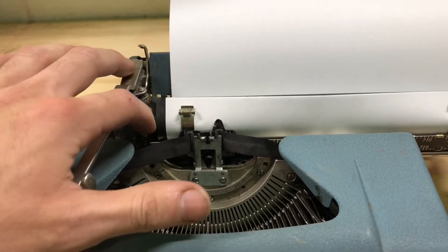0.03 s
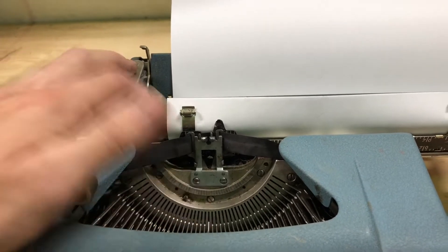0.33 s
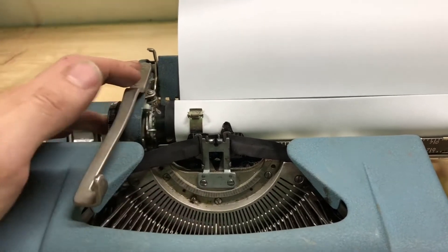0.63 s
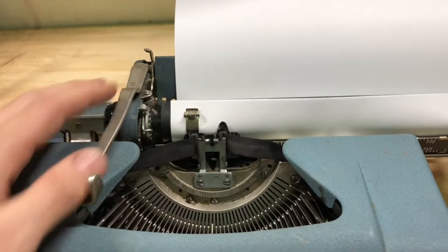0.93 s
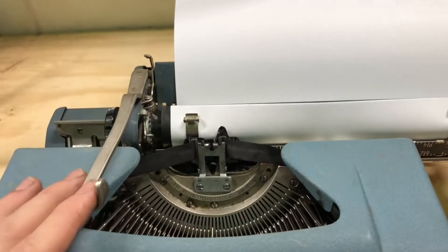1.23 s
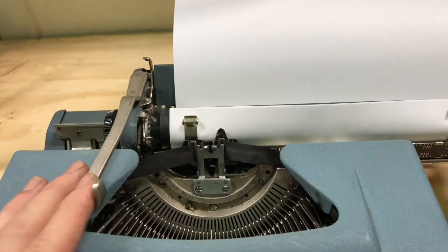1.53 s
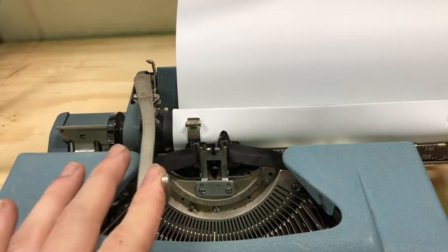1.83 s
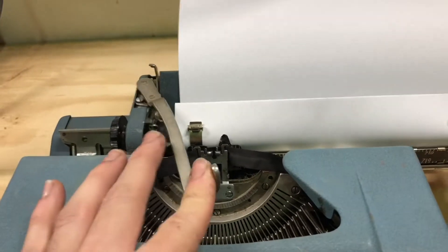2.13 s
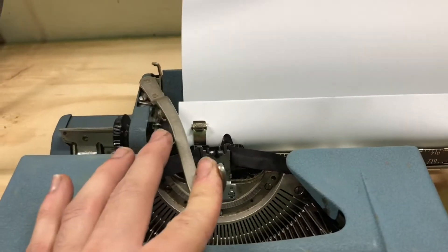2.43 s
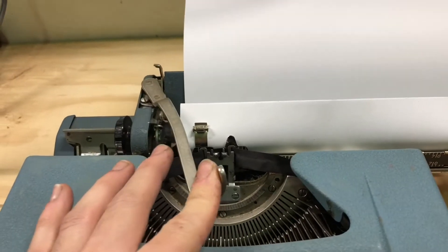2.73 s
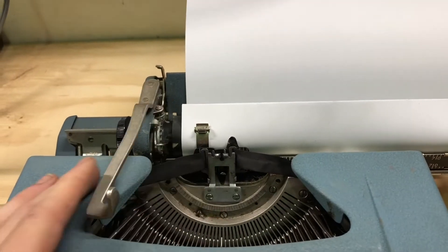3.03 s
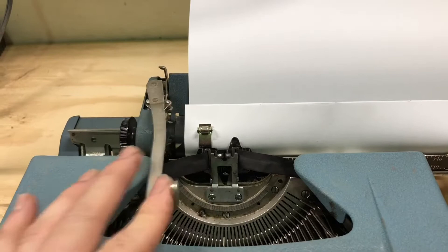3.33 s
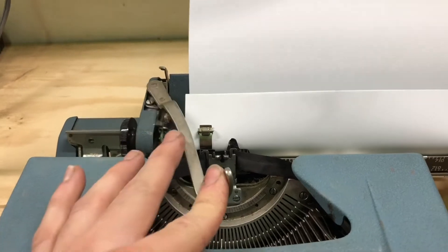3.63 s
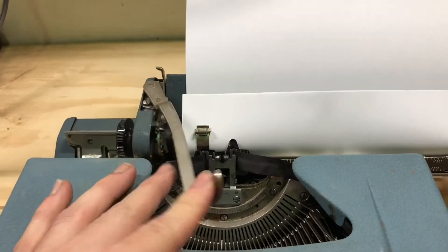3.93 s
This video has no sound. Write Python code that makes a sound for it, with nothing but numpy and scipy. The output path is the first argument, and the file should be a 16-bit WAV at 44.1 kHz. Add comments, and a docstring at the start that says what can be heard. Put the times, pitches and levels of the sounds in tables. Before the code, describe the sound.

Sharp clacks and brief scrapes of a typewriter's return lever and carriage in a quiet room.

```python
"""Typewriter carriage return

A hand works the return lever of a manual typewriter on a wooden desk in a quiet room. Friction
sounds as the lever turns the roller and the carriage slides; the lever hits its stop and springs
back with sharp clacks of the pawl. Each impact excites briefly ringing modes of the steel parts,
and the heavier ones make the desk boom. Beneath lie a hush, a low rumble and a faint mains buzz."""
import sys
import numpy as np
from scipy import signal
from scipy.fft import rfft, irfft
from scipy.io import wavfile

SR = 44100
rng = np.random.default_rng(int(sys.argv[2]) if len(sys.argv) > 2 else 0)


def output_pcm(signal):
    """Save a mono or channel-first signal as 16-bit PCM at the path in sys.argv[1].

    Samples are clipped to [-1, 1] before scaling.
    """
    pcm = np.clip(np.atleast_2d(signal).T, -1, 1) * 32767
    wavfile.write(sys.argv[1], SR, np.round(pcm).astype(np.int16))


N = 176400
TIME = np.arange(N) / SR

# modes of the lever: f/Hz, level/dB, T60/s (levels in all tables are relative)
LEVER_MODES = [(315, -13, 0.087), (880, -12, 0.034), (1434, -0.5, 0.037), (2000, -3, 0.035),
               (2188, 5, 0.03), (2414, -15, 0.11), (2513, -11.5, 0.12), (2860, -50, 0.053),
               (3200, -6.5, 0.038), (3550, -12, 0.06), (4060, -27.5, 0.25), (4500, -7, 0.023),
               (6160, -22, 0.076), (8350, -27, .15)]


def impacts():
    """Impact excitation: lever stops, pawl clacks and light taps each ring their own set of modes."""
    # t/s, contact time/s, level/dB at each of the four colour frequencies of blow()
    lever_stops = [(1.9438, 0.0017, -24.5, -24.5, -23, -34), (2.041, 0.0027, -37, -41.5, -36.5, -59),
                   (3.4461, 0.0012, -25, -24.5, -21, -30.5), (3.5154, 0.0022, -23.5, -25.5, -24.5, -33.5)]
    pawl_clacks = [(1.641, 0.0067, -69, -50, -44, -65), (1.652, 0.006, -67, -52, -31, -67),
                   (1.663, 0.0057, -34.5, -36, -29.5, -32.5), (2.2952, 0.0033, -39, -43, -46, -75),
                   (2.3085, 0.0036, -66, -22, -37.5, -33), (2.316, 0.0054, -36, -46, -29, -36),
                   (2.714, 0.0059, -38.5, -51, -40, -49), (2.726, 0.0073, -32, -33, -25, -35.5),
                   (2.9028, 0.00088, -35, -29.5, -23, -35), (2.9051, 0.00041, -35, -23.5, -10, -10.5),
                   (2.9353, 0.0012, -35, -28.5, -17.5, -13.5), (2.999, 0.0033, -30, -31.5, -26.5, -37),
                   (3.006, 0.0027, -46, -31, -24.5, -25), (3.012, 0.00066, -43, -27.5, -21, -23),
                   (3.193, 0.0025, -37, -43, -67, -70), (3.2008, 0.0021, -40.5, -38, -43.5, -26.5),
                   (3.324, 0.0022, -79, -32.5, -42, -59), (3.335, 0.0018, -33.5, -34.5, -31.5, -50),
                   (3.573, 0.00092, -35, -36, -36, -40), (3.593, 0.0019, -49, -26, -31.5, -45),
                   (3.601, 0.0057, -31.5, -38.5, -26, -29.5), (3.798, .001, -36, -49, -36, -47),
                   (3.8104, 0.0042, -29.5, -34.5, -25, -33.5), (3.958, 0.012, -50.5, -48, -57, -62),
                   (3.971, 0.0024, -39, -32.5, -41, -46), (3.9862, 0.0037, -32.5, -22.5, -19.5, -17.5)]
    light_taps = [(.001, 0.021, -57, -54.5, -54, -70), (.284, 0.0014, -61, -38, -40.5, -62),
                  (0.814, 0.0046, -49.5, -50.5, -64, -70), (.949, 0.00079, -46.5, -42, -54, -68),
                  (1.142, 0.0016, -48.5, -47.5, -59, -54), (1.2978, 0.0014, -43.5, -51.5, -70, -74),
                  (1.465, 0.0018, -57, -58, -74, -70), (1.606, 0.00078, -58, -48, -37, -92),
                  (1.62, 0.0051, -56, -46.5, -39, -85), (1.8404, 0.0077, -53, -56, -54, -62),
                  (1.863, .001, -47, -66, -55, -42), (2.104, 0.0066, -47, -48.5, -49.5, -73),
                  (2.504, 0.022, -85, -61, -61, -52), (3.277, 0.0038, -55, -52, -48, -73)]  # fingers and loose parts
    # f/Hz, level/dB, T60/s
    carriage_modes = [(426, -1, 0.032), (837, -6.5, 0.1), (930, -19, 0.091), (1417, -12.5, 0.096),
                      (2600, -15.5, 0.032), (3150, -0.5, 0.027), (3415, -5.5, 0.044), (4220, -24.5, 0.092),
                      (5680, -11.5, 0.017), (6770, -45, 0.083), (7020, -25.5, 0.072), (8850, -31, .12),
                      (8840, -11, 0.021)]
    casing_modes = [(722, -1, 0.037), (815, -3.5, 0.067), (990, -4, 0.069), (1282, -10.5, 0.13),
                    (1426, -4.5, 0.045), (3193, -2.5, 0.035), (4170, -5, 0.038)]
    out = np.zeros(N)
    for s, contact_s, *colour in lever_stops:
        add(out, s, blow(contact_s, colour, LEVER_MODES, ring_db=2, crack_db=20))
    for s, contact_s, *colour in pawl_clacks:
        add(out, s, blow(contact_s, colour, carriage_modes, ring_db=1, crack_db=-0.5))
    for s, contact_s, *colour in light_taps:
        add(out, s, blow(contact_s, colour, casing_modes, ring_db=2.5, crack_db=0))
    return amp(-1.5) * out


def blow(contact_s, colour, modes, ring_db, crack_db):
    """Transient response to one contact: a crack, the frame's dense modes and the struck part's ring."""
    colour_hz = [700, 2500, 7000, 13000]  # where a blow's spectrum is given: f/Hz
    frame_bands = [(206, -4, 0.16), (430, -7.5, 0.054), (594, -21, 0.19), (697, -3.5, 0.071),
                   (1220, -6.5, 0.065), (1970, -4.5, 0.053), (3430, -6.5, 0.091), (6300, -3, 0.029),
                   (8650, -6, 0.043), (15000, -8.5, 0.021)]  # response of the frame: f/Hz, level/dB, T60/s
    t = TIME[:SR // 4]
    swell_s, swell_cycles, crack_s = 0.00032, 2.61, 0.00019
    level = lambda hz: read(hz, colour_hz, colour)
    swell = lambda hz: 1 - np.exp(-(t / (swell_s + swell_cycles / hz)) ** 2)  # low modes build slowly
    noise_bands = bands(crowded_modes(len(t)), [row[0] for row in frame_bands])
    frame = np.zeros(len(t))
    for band, (hz, db, t60) in zip(noise_bands, frame_bands):
        envelope = swell(hz) * decay(np.maximum(t - contact_s, 0), t60)
        frame += amp(db + level(hz)) * unit(band * envelope) * np.sqrt(np.mean(envelope ** 2))
    crack = unit(np.diff(rng.standard_normal(len(t) + 1))) * np.exp(-t / crack_s)
    tone = sum(swell(hz) * ring([(hz, db + level(hz), t60)], t, spread_db=3, detune=0.01)
               for hz, db, t60 in modes)
    return frame + amp(crack_db + colour[-1]) * crack + amp(ring_db) * tone


def crowded_modes(size):
    """Modal overlap: the many modes one contact reaches merge into noise with random spectral peaks."""
    spacing_hz, spread_db = 110, 3.2
    hz = np.fft.rfftfreq(size, 1 / SR)
    knots = np.arange(0, SR / 2, spacing_hz)
    spectrum = rfft(rng.standard_normal(size))
    ripple_db = spread_db * np.interp(hz, knots, rng.standard_normal(len(knots)))
    return irfft(spectrum * amp(ripple_db), size)


def short_knocks():
    """Damped resonance: the hollow body answers the hardest blows with a short knock, and the lever rings
    briefly near 700 Hz as it rebounds."""
    knocks = [(1.673, -40.5, 384), (1.948, -23.5, 376), (2.318, -40, 693), (2.728, -25.5, 703),
              (3.009, -25.5, 417), (3.343, -35.5, 380), (3.45, -26, 409), (3.518, -26, 385),
              (3.812, -25, 707)]  # t/s, level/dB, f/Hz
    rise_s, t60 = 0.0039, 0.051
    out, t = np.zeros(N), TIME[:SR // 4]
    for s, db, hz in knocks:
        add(out, s, ring([(hz, db, t60)], t) * (1 - np.exp(-(t / rise_s) ** 2)))
    return out


def spring():
    """Free vibration: some blows leave a small spring pinging in its high modes."""
    pings = [(1.666, -54), (2.728, -55), (2.906, -44), (3.006, -49), (3.202, -53), (3.448, -45.5),
             (3.598, -49.5), (3.988, -33.5)]  # t/s, level/dB
    spring_modes = [(8780, 11, 0.023), (9430, -6.5, 0.36), (7290, 5, 0.055), (11828, -13, .08)]  # f/Hz, level/dB, T60/s
    out = np.zeros(N)
    for s, db in pings:
        add(out, s, amp(db) * ring(spring_modes, TIME[:SR // 2]))
    return out


def lever_friction():
    """Stick-slip friction: dense tiny slips of lever and roller rasp and drive the lever's modes."""
    strokes = [
        [(1.13, -64), (1.16, -57.5), (1.2, -61.5), (1.24, -80)],
        [(1.85, -72), (1.9, -48), (1.94, -37.5), (1.97, -58), (2.0, -46.5), (2.04, -40.5), (2.06, -69)],
        [(3.37, -76), (3.4, -44), (3.44, -40), (3.48, -47), (3.515, -40), (3.53, -62)],
    ]  # one envelope a stroke: t/s, level/dB
    rub_spectrum = [(240, -67), (400, -9), (545, -3.5), (852, -1), (1440, -2.5), (1730, -11), (1960, -4),
                    (2590, 0), (3530, -5.5), (6340, -3.5), (7170, -9.5), (14100, -16), (16000, -29)]  # f/Hz, spectral level/dB
    slips = impulses(N, per_s=5000) * amp(1.5 * np.minimum(rng.exponential(1, N), 4))
    rub = shaped(slips, rub_spectrum)
    ringing = unit(signal.fftconvolve(rub, ring(LEVER_MODES, TIME[:SR // 4]))[:N])
    effort = sum(np.interp(TIME, s, amp(db), 0, 0) for s, db in map(np.transpose, strokes))
    return effort * (rub + amp(-11.5) * ringing)


def carriage():
    """Forced and free vibration: the rail rings as the carriage chatters along it and jolts against it."""
    slides = [
        [(1.53, -66), (1.59, -58.5), (1.62, -50.5), (1.66, -50), (1.68, -57)],
        [(2.85, -80), (2.885, -52), (2.925, -46.5), (2.95, -37), (2.975, -51), (3.0, -38.5), (3.04, -72),
         (3.1, -59.5)],
        [(3.19, -58), (3.21, -51), (3.25, -59), (3.28, -45), (3.3, -47), (3.335, -47), (3.37, -72)],
    ]  # one envelope a slide: t/s, level/dB
    balances = [(0.5, -1), (3, -3), (-2, -5)]  # one row a slide: ring level/dB, hiss level/dB
    jolts = [(1.622, -57), (2.309, -43), (3.012, -41), (3.203, -30.5), (3.337, -42), (3.972, -37)]  # t/s, level/dB
    rail_modes = [(800, 0, 0.026), (910, 0, 0.04), (1050, -2, 0.022), (1250, -8, .015), (1434, -8, 0.035),
                  (3190, -2, 0.025), (4220, -7, 0.03), (5300, -9, 0.013), (6500, -6, .012)]  # f/Hz, level/dB, T60/s
    # f/Hz, spectral level/dB
    hiss_spectrum = [(300, -43), (900, 8), (2200, -21), (4500, -5.5), (6500, -11), (9000, -18),
                     (15000, -24)]
    jolt_rise_s = 0.0016
    out, t = np.zeros(N), TIME[:SR // 4]
    chatter = impulses(N, per_s=4000)
    ringing = unit(signal.fftconvolve(chatter, ring(rail_modes, t))[:N])
    hiss = shaped(chatter, hiss_spectrum)
    for (s, db), (ring_db, hiss_db) in zip(map(np.transpose, slides), balances):
        out += np.interp(TIME, s, amp(db), 0, 0) * (amp(ring_db) * ringing + amp(hiss_db) * hiss)
    for s, db in jolts:
        add(out, s, amp(db) * ring(rail_modes, t) * (1 - np.exp(-t / jolt_rise_s)))
    return out


def desk():
    """Structure-borne sound: the rocking machine drives the desk to a thump, a thud and low modes."""
    thumps = [(1.677, -30.5, 156), (1.693, -35, 89), (1.955, -32, 151), (2.051, -28, 175), (2.065, -33, 95),
              (2.319, -27, 147.3), (2.339, -28.5, 82), (2.730, -25, 163), (2.754, -26.5, 89.4),
              (3.019, -33, 110), (3.202, -29, 138), (3.346, -35, 152), (3.459, -30, 149), (3.522, -24, 176),
              (3.543, -34, 107), (3.604, -23.5, 129), (3.623, -28, 96), (3.815, -24.5, 163),
              (3.833, -29.5, 86)]  # t/s, level/dB, f/Hz
    desk_modes = [(69.8, 3, 0.28), (122.7, -0.5, 0.31), (168.6, 1.5, 0.27), (206.6, 4.5, 0.079)]  # f/Hz, level/dB, T60/s
    # f/Hz, spectral level/dB
    thud_spectrum = [(30, -46), (80, 1.5), (180, -3), (260, -12), (500, -21), (2000, -66)]
    rise_s = 0.0074
    out, t = np.zeros(N), TIME[:SR // 2]
    swing = lambda hz, db, t60: np.sqrt(2) * amp(db) * decay(t, t60) * np.sin(2 * np.pi * hz * t)
    linger = amp(-13) * sum(swing(*mode) for mode in desk_modes)
    for s, db, hz in thumps:
        thud = amp(-6) * shaped(rng.standard_normal(len(t)), thud_spectrum) * decay(t, t60=0.17)
        boom = swing(hz, db=0, t60=0.1) + linger + thud
        add(out, s, amp(db - 1) * boom * (1 - np.exp(-t / rise_s)))
    return out


def room(x):
    """Reverberation: the dense reflections of a small room die away sooner in the treble."""
    reverb_bands = [(208, -20, 1), (905, -9, 0.27), (2800, -16.5, 0.5), (7000, -20, 0.16),
                    (14100, -20, .13)]  # f/Hz, level/dB, T60/s
    delay_s = 0.011
    t = TIME[:SR // 2]
    reflections = bands(impulses(len(t), per_s=3000), [row[0] for row in reverb_bands])
    tail = np.zeros(len(t))
    for band, (hz, db, t60) in zip(reflections, reverb_bands):
        part = band * decay(t, t60) * (t > delay_s)
        tail += amp(db) * part / np.linalg.norm(part) * np.sqrt(2 * hz / SR)
    return signal.fftconvolve(x, tail)[:N]


def background():
    """Ambient noise: broadband hush, mains buzz and a narrow-band rumble that swells and ebbs."""
    hush_spectrum = [(12, -48), (20, -30), (53, -6), (81, -3.5), (120, -5.5), (177, -11.5), (198, -16.5),
                     (293, -18.5), (328, -24.5), (357, -22), (446, -25.5), (607, -27.5), (897, -29),
                     (1120, -31), (1530, -36), (1810, -35), (2900, -38), (3160, -39.5), (3400, -35.5),
                     (3900, -39.5), (6540, -39), (7200, -40.5), (9670, -44), (14700, -46), (16000, -53)]  # f/Hz, spectral level/dB
    rumble_envelope = [(0, -52.5), (1.5, -81), (2.0, -53), (2.55, -49.5), (2.95, -42.5), (3.3, -54.5),
                       (3.6, -47), (4, -47.5)]  # t/s, level/dB
    rumble_hz, width_octaves = 49.6, 0.12
    octaves = np.log2((np.fft.rfftfreq(N, 1 / SR) + 1) / rumble_hz)
    passband = np.exp(-.5 * (octaves / width_octaves) ** 2)
    rumble = unit(irfft(rfft(rng.standard_normal(N)) * passband, N))
    hush = amp(-50.5) * shaped(rng.standard_normal(N), hush_spectrum)
    return hush + mains_buzz() + amp(np.interp(TIME, *np.transpose(rumble_envelope))) * rumble


def mains_buzz():
    """Harmonic series: steady multiples of the mains frequency, a few standing out as a thin whine."""
    even_spectrum = [(120, -72), (600, -79), (1200, -89), (1800, -85), (3600, -87), (5500, -86),
                     (6700, -85), (7500, -95), (8400, -95), (9500, -106)]  # even harmonics: f/Hz, level/dB
    odd_offsets = [(120, -8), (4000, -9), (5200, -2), (6500, -1), (7000, -10)]  # odd harmonics against even ones: f/Hz, level/dB
    whine = [(34, -79), (38, -79), (50, -77.5), (56, -79), (72, -79.5), (78, -79), (84, -82), (88, -80),
             (97, -81), (103, -76.5), (109, -76.5), (111, -75), (254, -90)]  # harmonic number, level/dB
    mains_hz, harmonics = 59.972, np.arange(2, 160)
    hz = harmonics * mains_hz
    comb_db = read(hz, *np.transpose(even_spectrum)) + harmonics % 2 * read(hz, *np.transpose(odd_offsets))
    levels = {**dict(zip(harmonics, comb_db)), **dict(whine)}
    phase = np.linspace(0, 1, 8192)
    cycle = sum(np.sqrt(2) * amp(db) * np.sin(2 * np.pi * (k * phase + rng.random()))
                for k, db in levels.items())
    return amp(1) * np.interp(TIME * mains_hz % 1, phase, cycle)


def ring(modes, t, spread_db=0, detune=0):
    """Modal superposition: damped sines of random phase, with optional scatter in level and pitch."""
    scatter = rng.uniform(-1.06, 1, (len(modes), 3))
    return sum(np.sqrt(2) * amp(db + spread_db * louder) * decay(t, t60)
               * np.sin(2 * np.pi * (hz * (1 + detune * sharper) * t + phase))
               for (hz, db, t60), (louder, sharper, phase) in zip(modes, scatter))


def decay(t, t60):
    """Exponential damping: a fall of 60 dB in t60 seconds."""
    return np.exp(-np.log(1000) * t / t60)


def impulses(size, per_s):
    """Shot noise: impulses of random strength at random times."""
    return rng.standard_normal(size) * (rng.random(size) < per_s / SR)


def shaped(x, spectrum):
    """Spectral filtering by rows of f/Hz, level/dB, at rms 1."""
    gain = amp(read(np.fft.rfftfreq(len(x), 1 / SR), *np.transpose(spectrum)))
    return unit(irfft(rfft(x) * gain, len(x)))


def bands(x, centres):
    """Filter bank: overlapping bands of rms 1, rolled off below half the lowest centre."""
    hz = np.fft.rfftfreq(len(x), 1 / SR)
    spectrum = rfft(x) / np.sqrt(1 + (.5 * centres[0] / (hz + 1)) ** 8)
    return [unit(irfft(spectrum * read(hz, centres, row), len(x))) for row in np.eye(len(centres))]


def read(hz, points_hz, values):
    """Interpolation on a log-frequency axis."""
    return np.interp(np.log(hz + 1), np.log(np.asarray(points_hz) + 1), values)


def amp(db):
    """Amplitude ratio of a level in decibels."""
    return 10 ** (np.asarray(db) / 20)


def unit(x):
    """Normalisation to rms 1."""
    return x / np.sqrt(np.mean(x ** 2) + 1e-20)


def add(mix, s, sound):
    """Superposition of a sound on the mix, starting at s seconds."""
    part = mix[round(s * SR):][:len(sound)]
    part += sound[:len(part)]


def scene():
    """Superposition of the typewriter, its reverberation, the desk and the background, in mono."""
    machine = impacts() + short_knocks() + spring() + lever_friction() + carriage()
    return (machine + room(machine) + desk() + background())[None]


def record(dry):
    """Band limiting: the bass rolls off below 32 Hz and the treble ends at 16.1 kHz."""
    dry = signal.sosfilt(signal.butter(2, 32, "high", fs=SR, output="sos"), dry)
    lowpass = signal.firwin(255, 16100, window=("kaiser", 8), fs=SR)
    return signal.oaconvolve(dry, lowpass[None], "same")


dry = scene()
out = record(dry)
output_pcm(out)
```